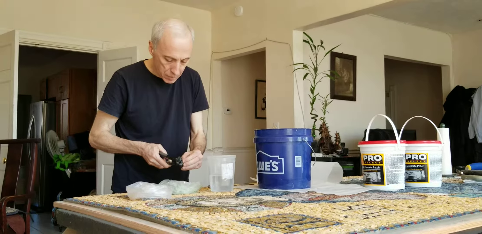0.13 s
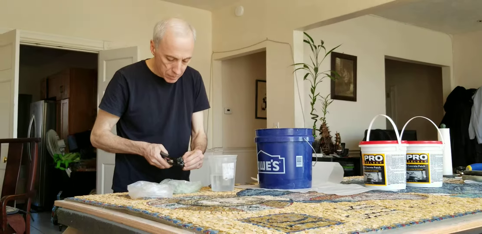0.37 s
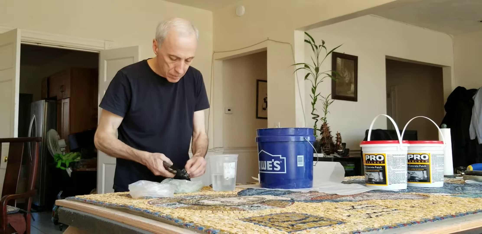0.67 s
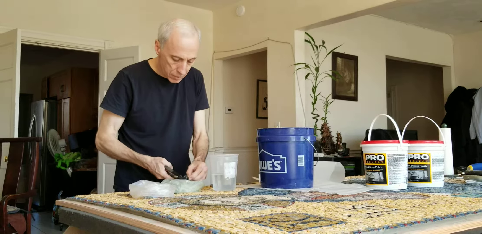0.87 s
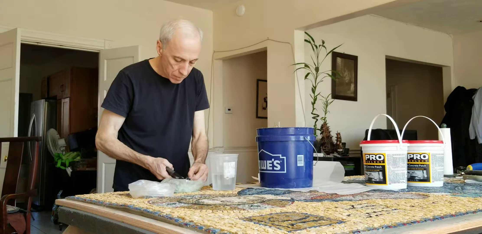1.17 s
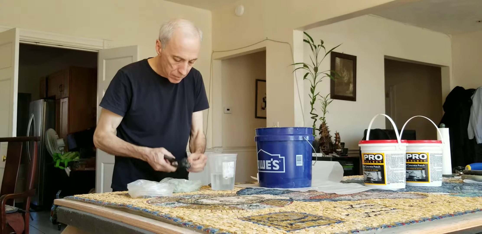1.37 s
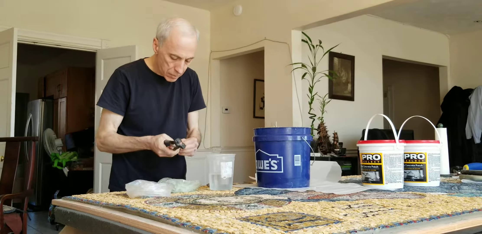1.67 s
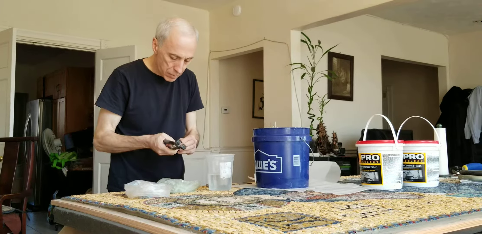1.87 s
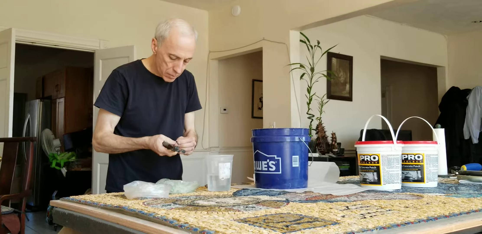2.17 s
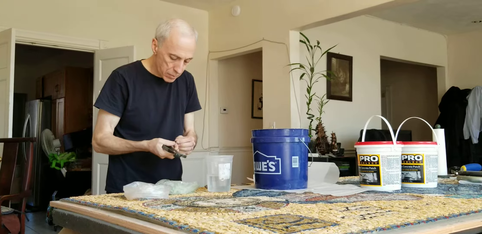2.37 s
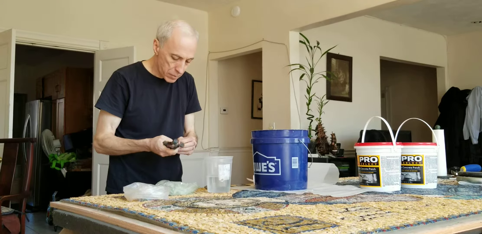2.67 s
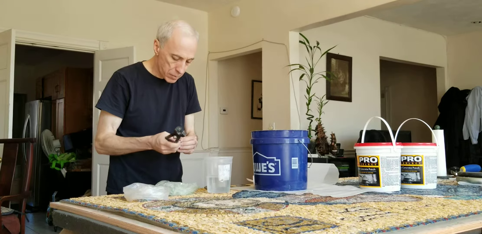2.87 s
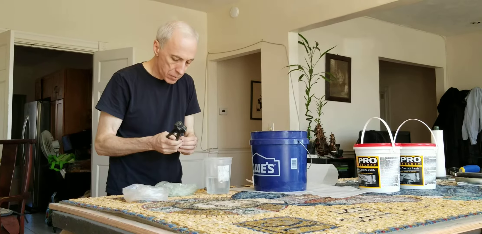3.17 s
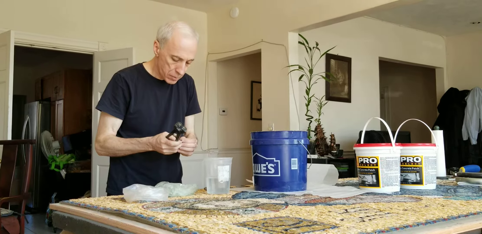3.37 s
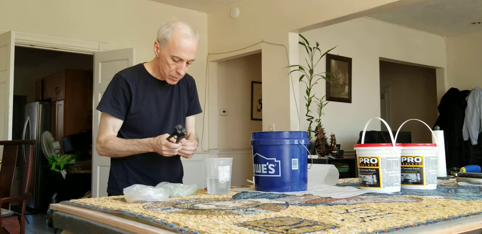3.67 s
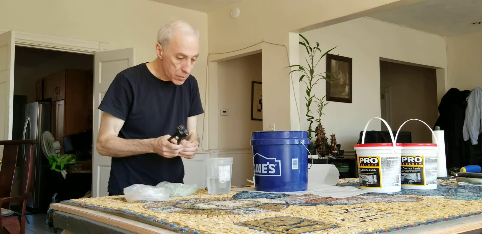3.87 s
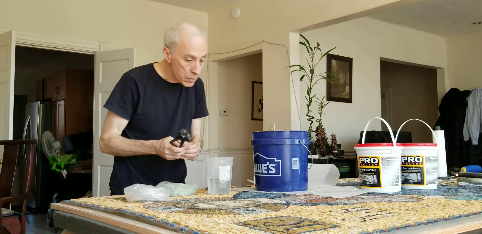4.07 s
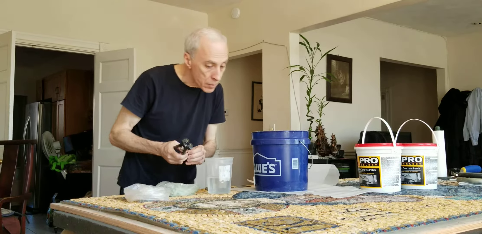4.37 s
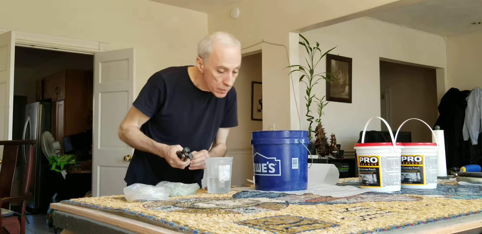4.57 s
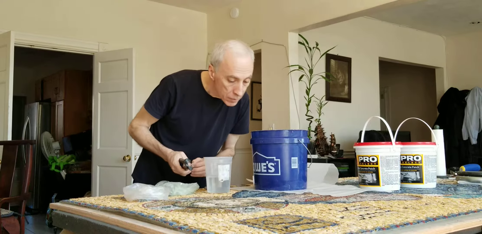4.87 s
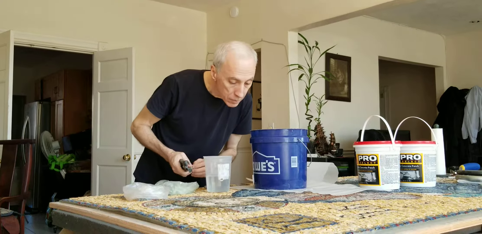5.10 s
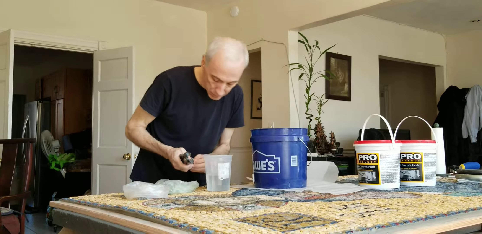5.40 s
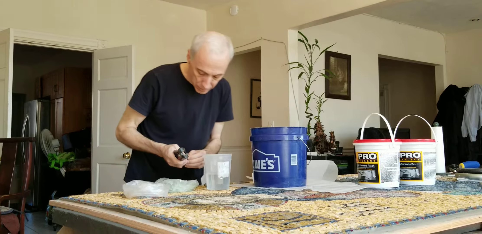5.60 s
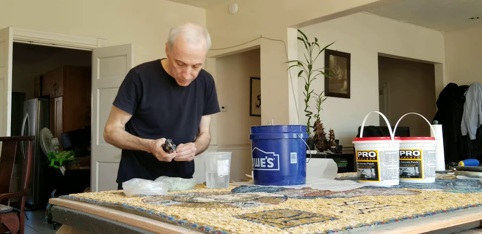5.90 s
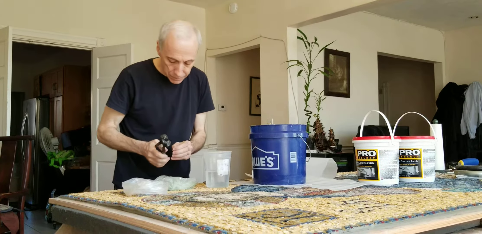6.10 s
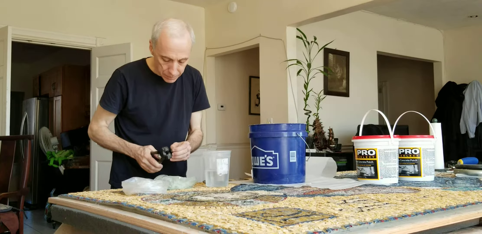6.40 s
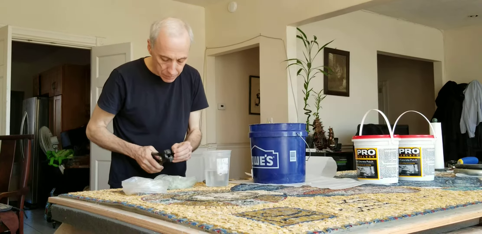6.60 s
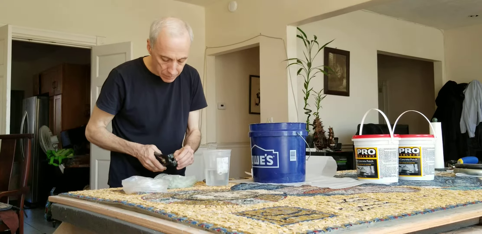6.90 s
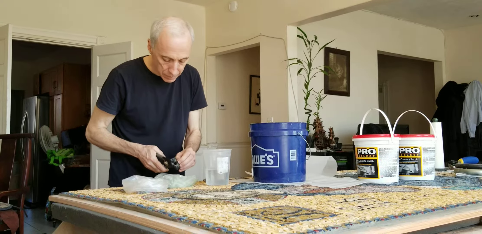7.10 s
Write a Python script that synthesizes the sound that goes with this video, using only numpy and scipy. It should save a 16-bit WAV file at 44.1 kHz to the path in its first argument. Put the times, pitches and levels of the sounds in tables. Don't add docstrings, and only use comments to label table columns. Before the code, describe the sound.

A bare reverberant room, heard by two spaced microphones, with a low engine idle, rumble and muffled traffic through an open door on the right. A car pulls away during the first second; brief brake squeals near 870 Hz sound at 0.15 and 0.35 s, while sleeves brush faintly. Nippers bite at 0.77 and 0.87 s, sharp and dry, then the tile snaps at 1.0 s in a dense, very loud burst lasting about 0.05 s, ringing bright and glassy, slightly left. The background ducks immediately. A small tick comes at 1.37 s, faint brake squeaks at 2.2 and 2.9 s, and a thin gliding whine lingers to 4.5 s. The level climbs from 3.3 to 3.9 s. Distant sparrows chirp in falling phrases around 2.6, 3.7, 4.5, 5.7 and 6.3 s. Faint ticks occur near 4.1 s; plastic rustles at 5.9 s, chips clink at 6.1 s, grit and cloth whisper at 7 s.

```python
import sys
import numpy as np
from scipy import signal
from scipy.fft import rfft, irfft, next_fast_len
from scipy.io import wavfile
from scipy.ndimage import uniform_filter1d, map_coordinates

SR = 44100
rng = np.random.default_rng(int(sys.argv[2]) if len(sys.argv) > 2 else 0)


def generate_wav(signal):
    frames = np.transpose(np.atleast_2d(signal))
    scaled = np.clip(frames, -1, 1) * 32767
    pcm = np.round(scaled).astype(np.int16)
    wavfile.write(sys.argv[1], SR, pcm)


def decibels_to_gain(level_db):
    exponent = np.asarray(level_db, float) / 20
    return 10 ** exponent


N = 319725
T = np.arange(N) / SR


def unit(x):
    return x / np.sqrt(np.mean(x ** 2) + 1e-20)


def along(points, hz):
    f, v = np.transpose(points)
    return np.interp(np.log(hz + 1), np.log(f + 1), v)


def curves(rows):
    s, *cols = np.transpose(rows)
    return [np.interp(T, s, c) for c in cols]


def wobble(rate, count=N):
    knots = rng.standard_normal(int(count * rate / SR) + 4)
    return map_coordinates(knots, [T[:count] * rate])


def filtered(x, response):
    m = next_fast_len(x.shape[-1] + 8192)
    spectrum = rfft(x, m) * response(np.fft.rfftfreq(m, 1 / SR))
    return irfft(spectrum, m)[..., :x.shape[-1]]


def causal(gain):
    c = irfft(np.log(gain + 1e-6))
    c[1:len(c) // 2] *= 2
    c[len(c) // 2 + 1:] = 0
    return np.exp(rfft(c))


def apart(pair, lag):
    def turn(hz):
        aimed = 1 / (1 + (850 / (hz + 1)) ** 4)
        return np.exp(-1j * np.pi * aimed * hz * lag / SR * np.array([[1], [-1]]))
    return filtered(pair, turn)


def rush(spectrum, patchy_db):
    # [pitch_hz, likeness 0-1]
    alike = [(60, 0.975), (130, 0.87), (290, 0.84), (640, 0.49), (1400, .35), (3000, 0.15), (8000, 0.078)]
    z = signal.stft(rng.standard_normal((2, N)), nperseg=512)[2]
    field = uniform_filter1d(rng.standard_normal(z.shape[1:]), size=6, axis=0)
    field = uniform_filter1d(field, size=14, axis=1)
    pair = signal.istft(z * decibels_to_gain(patchy_db * unit(field)), nperseg=512)[1][:, :N]

    def colour_and_width(hz):
        angle = np.arccos(np.clip(along(alike, hz), -1, 1)) / 2
        return decibels_to_gain(along(spectrum, hz)) * [np.cos(angle), np.sin(angle)]
    mid, side = filtered(pair, colour_and_width)
    return unit(np.array([mid + side, mid - side]))


def tone(hz, spread_hz, rough, count=N):
    rough = np.clip(rough, 0, 1)
    rate = max(spread_hz, 1)
    blur = unit(wobble(rate, count)) + 1j * unit(wobble(rate, count))
    turning = np.exp(2j * np.pi * np.cumsum(hz + 0 * T[:count]) / SR)
    return np.real((np.sqrt(2 - 2 * rough) + np.sqrt(rough) * blur) * turning)


def gate(start, length, edge):
    return np.clip(np.minimum(T - start, start + length - T) / edge + .5, 0, 1)


def room(x):
    # [pitch_hz, fade_s]
    fade = [(1000, .6), (2000, .52), (4000, .47), (8000, .39), (14000, 0.24)]
    hz, t, z = signal.stft(rng.standard_normal((2, SR // 2)), SR, nperseg=256)
    tail = signal.istft(z * decibels_to_gain(-60 * t / along(fade, hz)[:, None]), SR, nperseg=256)[1]
    tail = tail * (1 - np.exp(-np.arange(tail.shape[1]) / SR / 0.0035))
    return signal.fftconvolve(x[None], tail / np.linalg.norm(tail[0]), axes=1)[:, :len(x)]


def note(s, length, hz0, hz1, width_hz, db):
    x = np.zeros(N)
    span = slice(int((s - .02) * SR), min(N, int((s + length + .02) * SR)))
    glide = np.interp(T[span], [s, s + length], [hz0, hz1])
    buzz = tone(glide, 1.8 * width_hz, rough=1, count=len(glide))
    x[span] = decibels_to_gain(db) * gate(s, length, edge=0.0076)[span] * buzz
    return x


def microphone_hiss():
    # [pitch_hz, level_db per Hz]
    hiss_colour = [(2940, -34), (5000, -6.5), (5580, -4.5), (6410, -9), (7550, -6.5), (9180, -13),
                   (12300, -2), (15100, -2), (15700, -6.5)]
    return decibels_to_gain(-69) * rush(hiss_colour + [(16500, -3)], patchy_db=0)


def street():
    # [time_s, level_db]
    traffic = [(0, -47.5), (.45, -49), (.95, -50), (1.3, -49), (1.9, -48.5), (3.3, -48), (4.1, -46.5),
               (5.15, -47.5), (5.45, -50), (6.2, -50), (7.25, -51)]
    # [time_s, level_db]
    lorry = [(0, -38), (.22, -64.5), (1.05, -51), (1.4, -55.5), (2.3, -53), (2.9, -43.5), (3.3, -50.5),
             (4.1, -51), (4.951, -42), (5.8, -51), (6.4, -46.5), (6.6, -53.5), (7.25, -45)]
    # [time_s, level_db]
    wheels = [(0, -60), (.6, -53.5), (1.05, -58.5), (1.5, -62.5), (3.5, -67), (3.8, -64), (4.701, -69),
              (5.598, -68.5), (6.8, -72.5)]
    # [time_s, level_db]
    engine = [(0, -36.5), (.1, -50.5), (.35, -38), (.62, -38.5), (.87, -30.5), (1.07, -45.5), (1.19, -36.5),
              (2.2, -41), (2.89, -35.5), (3.2, -41), (3.5, -37), (4.25, -44), (4.5, -38.5), (5.0, -44.5),
              (5.3, -37.5), (6.2, -39.5), (6.9, -41), (7.1, -32.5)]
    # [time_s, pitch_hz, level_db]
    leaving_car = [(0, 140, -42), (.15, 158, -48), (.33, 186, -43.5), (.9, 189, -41.5), (1.16, 185, -54.5)]
    # [start_s, length_s, boost_db]
    revs = [(-0.5, 2.1, 3), (-1, 0.426, 0.5), (3.5, 0.18, 3), (5.5, 0.54, 3)]
    # [pitch_hz, level_db per Hz]
    rumble_colour = [(15, -23.5), (24, -12.5), (33, -3), (39, 1), (47, -3), (56, -4.5), (75, -28.5),
                     (120, -120)]
    roar_colour = [(190, -36), (330, -9), (392, -4), (453, -5), (511, -4), (636, -6.5), (803, -2.5),
                   (1010, -6), (1290, -9), (2000, -21.5), (2600, -47.5), (4400, -120)]
    exhaust_colour = [(44, -30.5), (75, -1), (90, -6), (130, -10.5), (189, -6), (301, -15), (341, -25),
                      (388, -12.5), (420, -16), (550, -47.5), (920, -120)]
    tyre_colour = [(820, -37), (1400, -6.5), (1810, -19.5), (2120, -4), (3430, -8), (5870, -17.5),
                   (7640, -24.5), (9000, -35), (11700, -65.5), (19800, -120)]

    (roar_db,), (rumble_db,), (tyre_db,), (effort_db,) = map(curves, (traffic, lorry, wheels, engine))
    car_hz, car_db = curves(leaving_car)
    exhaust_db = roar_db + 1.5 + sum(db * gate(s, length, edge=.15) for s, length, db in revs)
    firing_db = effort_db + wobble(9)
    duct_db = -52.5 + 0.24 * (effort_db - effort_db.mean()) + 5 * wobble(11)

    noise = decibels_to_gain(rumble_db + 5.0) * rush(rumble_colour, patchy_db=2.0)
    noise += decibels_to_gain(roar_db + 1.5) * rush(roar_colour, patchy_db=0.27)
    noise += decibels_to_gain(exhaust_db) * rush(exhaust_colour, patchy_db=-0.0256)
    noise += decibels_to_gain(tyre_db) * rush(tyre_colour, patchy_db=3.14)
    noise += decibels_to_gain(rumble_db - 5) * tone(35, spread_hz=6.3, rough=.4)

    idle = decibels_to_gain(firing_db - 1.95) * tone(63.9, spread_hz=12, rough=0.052)
    idle += decibels_to_gain(duct_db - 2.5) * tone(86, spread_hz=12, rough=0.14)

    car = gate(-0.73, 2.433, edge=.1) * decibels_to_gain(car_db - 2 + 1.8 * wobble(16))
    car *= tone(car_hz, spread_hz=7.5, rough=0.13)
    car += gate(0.14, 0.86, edge=0.041) * decibels_to_gain(-53.5) * tone(335, spread_hz=40, rough=0.73)
    return apart(noise + idle + car, lag=19)


def motor_whine():
    # [time_s, pitch_hz, level_db]
    whine = [(.15, 5200, -82.5), (.6, 5722, -59), (.76, 5940, -68.5), (1.3, 6100, -73.5), (2.3, 5884, -80),
             (2.8, 5413, -82.5), (3.7, 5680, -76.5), (4.2, 5760, -78), (4.5, 5800, -100)]
    hz, db = curves(whine)
    return decibels_to_gain(db - 4) * tone(hz, spread_hz=160, rough=.6)


def brake_squeals():
    # [start_s, length_s, pitch_hz, level_db, extra pitch at the start in Hz]
    brake = [(0.15, 0.154, 869, -38, 30), (.352, .18, 864, -42, 1.35), (2.21, 0.133, 647, -55.5, 0.985),
             (2.879, 0.103, 875, -52, 0.984)]
    # [multiple of the pitch, level_db]
    overtones = [(1, -3), (2, -15), (3, -21.5)]
    x = np.zeros(N)
    for s, length, hz, db, sharp_hz in brake:
        t = np.clip(T - s, 0, None)
        pitch_hz = hz + sharp_hz * np.exp(-(t / .04) ** 2)
        level_db = db - 39.5 * t
        on = gate(s, length, edge=0.016) * decibels_to_gain(level_db + .6 * wobble(25))
        dull_db = np.maximum(.8 * (level_db - brake[0][3]), -7)
        for k, overtone_db in overtones:
            ring = tone(k * pitch_hz, spread_hz=20 * k, rough=0.074)
            x += on * decibels_to_gain(overtone_db + (k - 1.5) * dull_db) * ring
    return apart(decibels_to_gain(2.5) * np.array([x, x]), lag=16.9) + decibels_to_gain(-12.5) * room(x)


def birds():
    # [length_s, start_hz, end_hz, width_hz, level_db]
    slow_phrase = [(.07, 4720, 4380, 480, -6.5), (.045, 3820, 3400, 135, -1), (0.0773, 3520, 3350, 250, -9)]
    quick_phrase = [(.042, 4550, 4600, 350, -6), (.035, 3480, 3420, 180, -4), (.065, 3110, 3060, 170, 0)]
    # [start_s, level_db, boost of the first note in dB]
    slow_calls = [(3.67, -64.5, 0.99), (6.298, -66.5, .1)]
    quick_calls = [(2.568, -69, 0), (4.525, -69.5, 3), (5.745, -67, -10.5)]
    # [start_s, length_s, pitch_hz, level_db]
    peeps = [(2.04, .035, 3797, -72.5), (2.41, .04, 3690, -75.5), (2.8, .02, 4700, -72.5),
             (2.845, .02, 4700, -70.5), (2.915, .02, 4720, -71), (3.055, .02, 4710, -70.5),
             (5.4, 0.028, 3092, -81), (5.46, .035, 3052, -73.5), (5.57, 0.036, 3050, -77.5),
             (5.66, 0.052, 3080, -79.5), (5.79, 0.087, 3600, -76.5), (5.883, 0.1366, 2896, -71),
             (6.89, .04, 4700, -84), (6.957, 0.051, 4480, -83), (7.03, .045, 6007, -81),
             (7.18, 0.054, 5296, -82.5)]
    # [start_s, length_s, pitch_hz, level_db]
    seeps = [(1.3, 0.18, 10600, -77), (1.58, .14, 10540, -77), (1.65, .038, 8805, -74.5),
             (1.97, 0.132, 10500, -84), (2.395, 0.071, 8200, -76.5), (2.43, 0.086, 8757, -79),
             (2.548, .2, 8120, -82.5), (4.17, .035, 7734, -75.5), (4.606, 0.12, 8760, -83.5),
             (6.36, 0.0707, 7580, -81.5)]
    x = np.zeros(N)
    for phrase, calls in ((slow_phrase, slow_calls), (quick_phrase, quick_calls)):
        for s, db, first_db in calls:
            for length, hz0, hz1, width_hz, level in phrase:
                x += note(s, length, hz0, hz1, width_hz, db + level + first_db)
                s, first_db = s + length, 0
    for rows, fall, width in ((peeps, .03, 0.046), (seeps, 0.01218, 0.011)):
        for s, length, hz, db in rows:
            x += note(s, length, hz, hz * (1 - fall), hz * width, db)
    return decibels_to_gain(3) * x + decibels_to_gain(-1.5) * room(x)


def sleeves():
    # [start_s, length_s, level_db]
    moves = [(0, .55, -70), (3.66, 1.2, -74), (5.88, .75, -70.5), (6.95, .5, -72)]
    # [pitch_hz, level_db per Hz]
    cloth_colour = [(2000, -26.5), (3500, -9), (6000, 1.5), (8000, 0), (9300, -5), (11000, 0.5),
                    (15000, 1.5), (16500, -120)]
    swell = sum(decibels_to_gain(db) * gate(s, length, edge=0.04) for s, length, db in moves)
    return swell * decibels_to_gain(0.5 * wobble(5.8)) * rush(cloth_colour, patchy_db=0.5)


def bag():
    # [start_s, length_s, level_db]
    rustles = [(5.887, 0.252, -63)]
    # [pitch_hz, level_db per Hz]
    bag_colour = [(1200, -12), (2300, 8), (3500, -7.5), (5400, 2), (7100, -28.5), (10200, -18.5),
                  (15500, -17.5)]
    swell = sum(decibels_to_gain(db) * gate(s, length, edge=0.071) for s, length, db in rustles)
    return swell * decibels_to_gain(1.5 * wobble(60)) * rush(bag_colour + [(16500, -120)], patchy_db=1.2)


def grit():
    # [start_s, length_s, pitch_hz, width_hz, level_db]
    scrapes = [(5.869, .75, 10430, 695, -87), (7.009, 0.062, 13340, 2510, -74.5)]
    x = sum(note(s, length, hz, hz, width_hz, db) for s, length, hz, width_hz, db in scrapes)
    x = x * decibels_to_gain(1.5 * wobble(9))
    return decibels_to_gain(-0.5) * x + decibels_to_gain(4.5) * room(x)


def clinks():
    # [start_s, pitch_hz, time to fade by 60 dB in s, level_db]
    touches = [(1.0092, 13700, 0.008, -13), (1.016, 13420, 0.041, -19), (1.016, 5148, 0.16, -33.5),
               (1.016, 3904, 0.12, -32), (1.376, 3957, 0.0426, -51.5), (6.074, 7640, 0.129, -55.5),
               (6.075, 14530, .08, -52.5), (6.075, 15600, .07, -57.5), (6.075, 4010, 0.085, -58.5),
               (6.078, 13000, .05, -61), (6.113, 8970, 0.087, -59.5), (6.113, 12800, .05, -60.5),
               (6.113, 13800, .08, -56.5), (6.113, 6200, .06, -67.5)]
    x = np.zeros(N)
    for s, hz, t60, db in touches:
        t = np.clip(T - s, 0, None)
        fade = decibels_to_gain(db - 60 * t / t60) * (1 - np.exp(-t / 0.00049))
        x += fade * np.sin(2 * np.pi * hz * t)
    return x * decibels_to_gain([[3], [-4]]) + decibels_to_gain(3.5) * room(x)


def cracks(events, colour, t60, wet_db, ring_db):
    # [pitch_hz, width_hz, level_db]
    tile = [(2689, 270, -1.5), (3760, 250, -5.5), (5390, 51, -7.5), (7470, 320, -5), (9772, 63, -9.5),
            (13700, 43, -3), (13900, 33, -2.5), (15075, 56, -10.5)]
    x, t = np.zeros(N + SR), np.arange(SR // 20) / SR
    for s, db in events:
        burst = decibels_to_gain(db + 1 - 60 * t / t60) * np.tanh(t / 0.00023) * rng.standard_normal(len(t))
        x[round(s * SR):][:len(t)] += burst

    def ring(f):
        return sum(decibels_to_gain(db + ring_db) * 1j * f * w / (c * c - f * f + 1j * f * w) for c, w, db in tile)
    x = filtered(x[:N], lambda f: causal(decibels_to_gain(along(colour, f))) * (1 + ring(f + 1)))
    return apart(x * decibels_to_gain([[3.5], [-4]]), lag=-7.0) + decibels_to_gain(wet_db) * room(x)


def nippers():
    # [time_s, peak level_db]
    bite_times = [
        (.7667, -23.5),
        (.7745, -34),
        (.8722, -23),
        (.8742, -21),
        (.8805, -30.5),
    ]
    # [time_s, peak level_db]
    snap_times = [
        (1.0055, -17),
        (1.0092, -5),
        (1.0155, -6),
        (1.0215, -6.5),
        (1.0265, -7.5),
        (1.0305, -15),
        (1.036, -14),
        (1.049, -12),
    ]
    # [time_s, peak level_db]
    tick_times = [(1.3748, -42), (4.08, -61), (4.19, -59.5), (6.076, -49), (6.113, -47.5), (6.965, -62.5)]
    # [pitch_hz, level_db per Hz]
    bite_colour = [(3060, -30), (5750, -19.5), (6500, -2), (7610, -10), (8510, -17.5), (10000, -21),
                   (11100, -15), (13700, -19), (15100, -14.5), (15800, -22)]
    snap_colour = [(560, -50.5), (950, -22.5), (1490, -27.5), (1920, -6), (2240, -9.5), (2770, -5.5),
                   (3630, -11.5), (4080, -6), (4540, -18), (5230, -1.5), (5810, -14), (7890, -5.5),
                   (10200, -13.5), (13600, -4), (15800, -10)]
    tick_colour = [(1760, -70.5), (3000, -0.5), (3540, -12), (4950, -7), (5730, -23), (6010, -5.5),
                   (7460, -9), (8280, -12), (13300, 0), (15800, 2)]
    bites = cracks(bite_times, bite_colour, t60=.014, wet_db=-0.5, ring_db=-7.5)
    snap = cracks(snap_times, snap_colour, t60=0.009, wet_db=6.0, ring_db=-7)
    ticks = cracks(tick_times, tick_colour, t60=.01, wet_db=2, ring_db=-20)
    return decibels_to_gain(12.0) * bites + decibels_to_gain(7) * snap + decibels_to_gain(7.5) * ticks


def scene():
    background = street() + motor_whine() + brake_squeals() + birds()
    handling = sleeves() + bag() + grit() + clinks()
    return background + handling + nippers()


def automatic_gain_db():
    duck_s, back_s = 0.9982, 3.278
    return np.interp(T, [duck_s, duck_s + .095, back_s, back_s + 0.652], [0, -9, -9, -2])


def low_pass(x):
    return signal.sosfilt(signal.butter(12, 16800, fs=SR, output="sos"), x)


def record(dry):
    levelled = (dry + microphone_hiss()) * decibels_to_gain(automatic_gain_db())
    limited = filtered(levelled, lambda hz: causal(1 / (1 + (hz / 16000) ** 150)))
    return low_pass(limited)


dry = scene()
out = record(dry)
generate_wav(out)
```